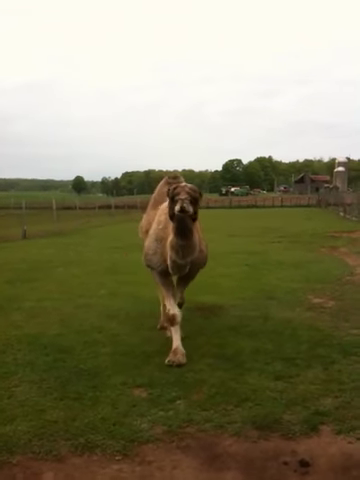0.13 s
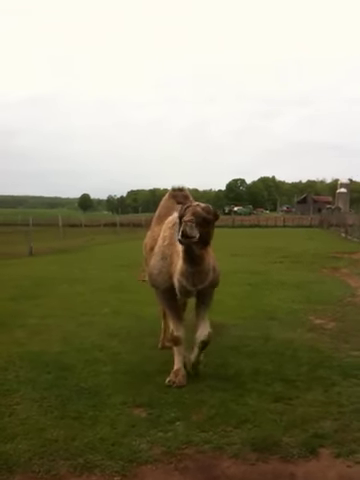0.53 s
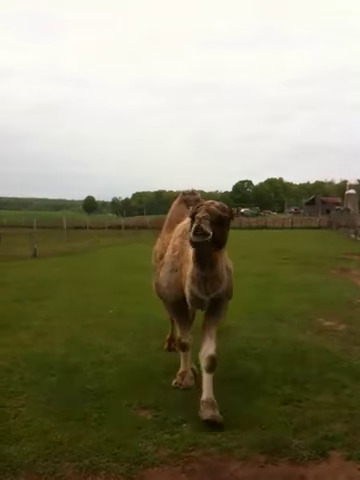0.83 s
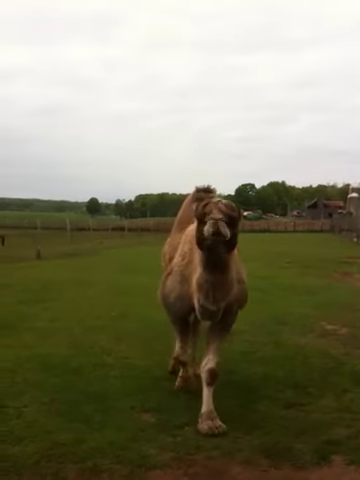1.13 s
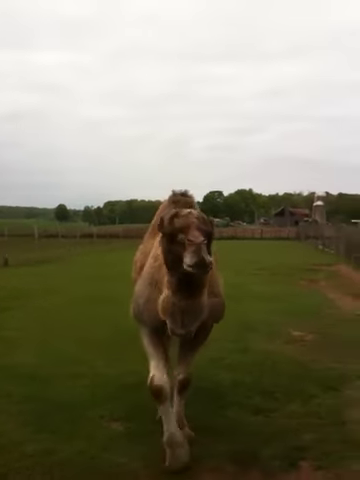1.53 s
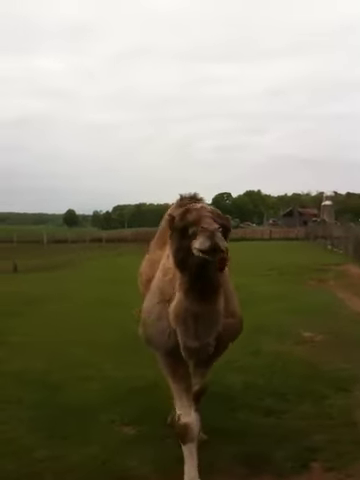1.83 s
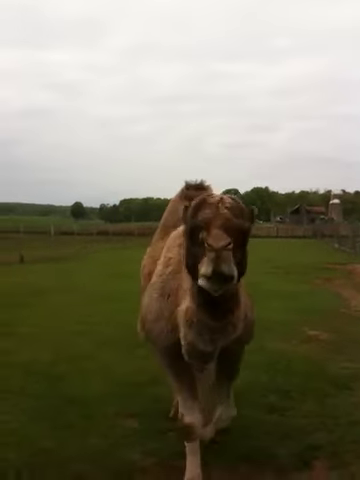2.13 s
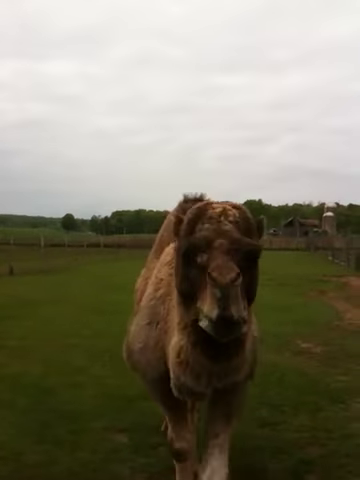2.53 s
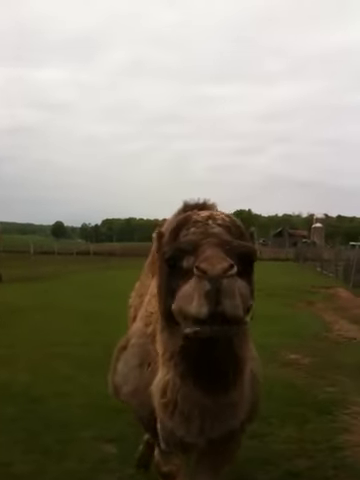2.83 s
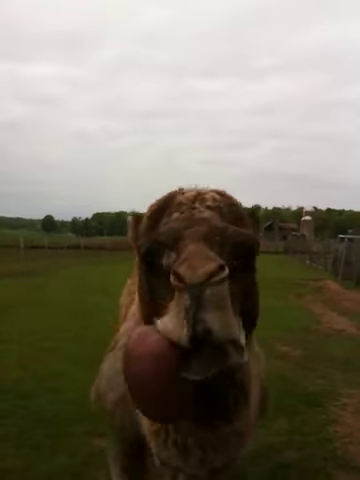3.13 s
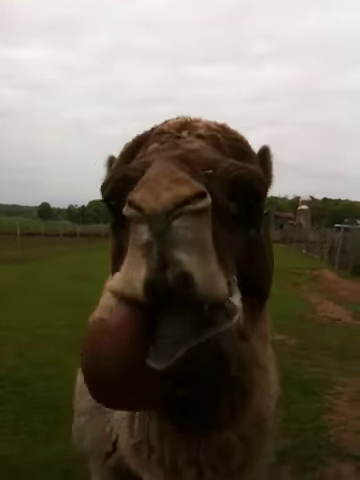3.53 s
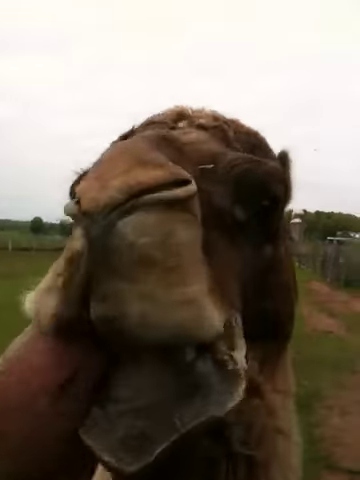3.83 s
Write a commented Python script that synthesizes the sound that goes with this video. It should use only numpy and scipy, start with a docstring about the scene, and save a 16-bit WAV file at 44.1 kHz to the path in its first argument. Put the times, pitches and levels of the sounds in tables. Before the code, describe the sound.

Over faint wind and hiss outdoors, a camel's low pulsing rumble grows and evens out. It swells into a loud, close, bubbling gurgle with spluttering spit, ending in the low flutter of its slack throat sac.

```python
"""Camel rumbling and gurgling

A camel in a field rumbles: slow pulses ring its throat and mouth, first loose, then an even purr.
Close by it blows out its throat sac: air bubbles through in a loud gurgle with wet puffs of spray,
then the slack sac flutters and the lips smack. Faint wind and hiss lie under it."""
import sys
import numpy as np
from scipy import signal
from scipy.fft import rfft, irfft, next_fast_len
from scipy.io import wavfile
from scipy.ndimage import uniform_filter1d, map_coordinates

SR = 44100
rng = np.random.default_rng(int(sys.argv[2]) if len(sys.argv) > 2 else 0)


def generate_wav(sig):
    """Save sig (samples, or channels by samples) to the path in sys.argv[1] as 16-bit PCM at SR."""
    pcm = np.round(np.clip(np.atleast_2d(sig).T, -1, 1) * 32767).astype(np.int16)
    wavfile.write(sys.argv[1], SR, pcm)


N = 176400


def amp(db):
    """Decibels to gain."""
    return 10 ** (np.asarray(db) / 20)


def unit(x):
    """Scale to rms 1."""
    return x / np.sqrt(np.mean(x ** 2) + 1e-20)


def curve(rows, column=1):
    """One column of a timed table, one value per sample."""
    rows = np.asarray(rows)
    return np.interp(np.arange(N) / SR, rows[:, 0], rows[:, column])


def fader(rows):
    """Gain of a level curve that fades in before its first point."""
    return amp(curve(rows) - 110 * np.maximum(rows[0][0] - np.arange(N) / SR, 0))


def wobble(rate):
    """A smooth random curve, rate knots a second."""
    return map_coordinates(rng.standard_normal(2048), [np.arange(N) * rate / SR], mode="wrap")


def even(x, span_s):
    """Hold the slow level of x near rms 1, keeping its fast flutter."""
    size = max(int(span_s * SR), 8)
    power = np.abs(uniform_filter1d(uniform_filter1d(unit(x) ** 2, size), size))
    return x / np.sqrt(np.mean(x ** 2) * (power + 0.0052))


def eq(x, points):
    """Minimum-phase filter through (freq_hz, gain_db) points."""
    size = 2 * next_fast_len(N // 2 + 8192)
    hz, db = np.transpose(points)
    gain = amp(np.interp(np.log(np.fft.rfftfreq(size, 1 / SR) + 1), np.log(hz + 1), db))
    cepstrum = irfft(np.log(gain), size)
    cepstrum[1:size // 2] *= 2
    cepstrum[size // 2 + 1:] = 0
    return irfft(rfft(x, size) * np.exp(rfft(cepstrum)), size)[:N]


def add(out, start_s, x):
    """Mix x into out at start_s."""
    i = int(np.clip(start_s * SR, 0, N))
    out[i:i + len(x)] += x[:N - i]


def glide(hz):
    """A sine that follows a pitch curve."""
    return np.sin(2 * np.pi * np.cumsum(hz) / SR)


def beats(rate, scatter):
    """Sample indices of pulses at a rate, their timing scattered by a share of the period."""
    i = np.flatnonzero(np.diff(np.floor(np.cumsum(rate) / SR)))
    shift = rng.standard_normal(4096)[:len(i)] * (scatter * SR / rate)[i]
    return np.clip(i + shift, 0, N - 1).astype(int)


def swell(t, rise_s):
    """Soft rise to 1 at rise_s, then a decay."""
    return (t / rise_s * np.exp(1 - t / rise_s)) ** 2


# Low wind and airy hiss: freq_hz, gain_db
WIND_EQ = [(20, -15), (64, -14.5), (125, -0.5), (232, -4.5), (408, -13.5), (1400, -25), (3300, -100)]
HISS_EQ = [(590, -23.5), (1100, -2), (5000, -4), (15500, -6.5)]


def field(wind_db=-71.5, hiss_db=-75.5):
    """A bed of light wind and even hiss."""
    wind = unit(eq(rng.standard_normal(N), WIND_EQ)) * amp(0.5 * wobble(2.8))
    hiss = unit(eq(rng.standard_normal(N), HISS_EQ))
    return amp(wind_db) * wind + amp(hiss_db) * hiss


# Wet clicks: start_s, peak_db, centre_hz, width_octaves
SMACK_HITS = [(1.089, -64, 560, 0.49), (1.422, -61.5, 596, 0.56), (1.889, -53, 590, 0.63),
              (2.038, -59, 594, 0.33), (2.117, -58.5, 3500, 1.6), (2.211, -58, 600, 0.51),
              (2.392, -51, 730, 0.28), (2.413, -54, 730, 0.27), (2.874, -60, 801, .9),
              (3.717, -45.5, 1600, 0.69), (3.747, -54, 2000, 1.7), (3.755, -52, 2300, .5),
              (3.755, -53.5, 6300, 0.44), (3.775, -56.5, 4000, 1.9), (3.851, -60.5, 1400, 0.85),
              (3.9, -51, 4000, 1.46), (3.921, -55, 1400, 0.81), (3.944, -54.5, 1000, 1.1),
              (3.952, -52, 950, 0.88)]


def smacks(t60_s=0.0058):
    """Lips and tongue click in short ticks of band-passed noise."""
    out, t = np.zeros(N), np.arange(SR // 30) / SR
    for start, db, hz, octaves in SMACK_HITS:
        edge = 2 ** (octaves / 2)
        band = signal.butter(2, [hz / edge, min(hz * edge, SR / 2 - 1)], "band", fs=SR, output="sos")
        click = signal.sosfilt(band, rng.standard_normal(len(t)) * amp(-60 * t / t60_s))
        add(out, start, amp(db) * click / np.abs(click).max())
    return out


def spray(count, decay_s, air):
    """Tiny saliva bubbles ring at 900 to 6300 Hz in a rush of air."""
    out, t = np.zeros(N), np.arange(SR // 60) / SR
    for when, pitch, size in rng.random((count, 3)):
        ping = np.exp(-t / decay_s) * np.sin(2 * np.pi * 900 * 7 ** pitch * t)
        add(out, when * N / SR, amp(5.5 * size) * ping)
    return air * rng.standard_normal(N) + unit(out)


# Puffs of spray: start_s, attack_s, hold_s, release_s, level_db, tilt_db_per_octave
PUFF_HITS = [(3.128, 0.036, 0.012, 0.36, -69.5, 1.5), (3.288, 0.035, 0.023, .15, -60.5, 1.6),
             (3.371, 0.027, 0.04, .05, -66, -0.5), (3.621, 0.015, 0.013, 0.037, -52.5, -0.5),
             (3.649, .01, 0.038, 0.044, -57.5, -1.5)]
# Bright sizzle of the spray: freq_hz, gain_db
SPRAY_EQ = [(500, -7), (1200, 1.5), (1900, -2), (3500, 1), (4800, -5), (6500, -1.5), (8500, -8),
            (10000, -14.5), (12200, -12.5), (14500, -45)]


def puffs():
    """Air bursts past the wet lips; each puff falls 30 dB in its release time."""
    out, t = np.zeros(N), np.arange(N) / SR
    wet = spray(count=2400, decay_s=0.003, air=1.5)
    for start, attack, hold, release, db, tilt in PUFF_HITS:
        rise = np.clip((t - start) / attack, 0, 1)
        fall = amp(-30 * np.maximum(t - start - attack - hold, 0) / release)
        tilted = [(hz, gain_db + tilt * np.log2(hz / 3000)) for hz, gain_db in SPRAY_EQ]
        out += amp(db) * rise * fall * unit(eq(wet, tilted))
    return out * amp(1.2 * wobble(110))


# Saliva sweep: time_s, pitch_hz, level_db
SQUELCH_SWEEP = [(3.385, 2400, -78.5), (3.415, 3550, -60), (3.455, 5000, -66), (3.55, 5000, -110)]


def squelch():
    """Saliva squelches in a thin, rough, rising tone."""
    tone = glide(curve(SQUELCH_SWEEP) * (1 + 0.08 * wobble(1500))) * amp(4 * wobble(150))
    started = np.arange(N) / SR > SQUELCH_SWEEP[0][0]
    return tone * amp(curve(SQUELCH_SWEEP, column=2)) * started


# Lip flutters: start_s, length_s, level_db, pitch_hz
SPLUTTER_HITS = [(3.019, 0.027, -71.5, 1650), (3.075, 0.023, -61, 700), (3.146, 0.05, -50, 730),
                 (3.318, .06, -47, 770), (3.335, 0.035, -65, 1170), (3.391, 0.044, -58, 1330),
                 (3.401, 0.079, -54, 1150), (3.62, 0.079, -52, 940), (3.697, .026, -51, 1120),
                 (3.686, 0.044, -41, 450), (3.926, .045, -46.5, 790), (3.876, 0.048, -33.5, 536.3),
                 (3.969, 0.03, -32, 490), (3.735, 0.047, -45, 557.6)]


def splutters():
    """Flapping wet lips ring a mouth cavity at an unsteady pitch."""
    out, t = np.zeros(N), np.arange(N) / SR
    for start, length, db, hz in SPLUTTER_HITS:
        arch = np.sin(np.pi * np.clip((t - start) / length, 0, 1))
        out += amp(db) * arch * glide(hz * (1 + 0.1 * wobble(450)))
    return out * amp(2.5 * wobble(90))


# Deep gulps: start_s, peak_db, final_pitch_hz
GLUG_HITS = [(.688, -58, 146), (1.084, -58, 268), (1.42, -47, 171), (1.624, -49.5, 176.6),
             (1.883, -47.5, 235), (1.903, -38, 145), (2.071, -38, 158)]


def glugs(drop_s=0.0026):
    """Single gulps whose pitch drops fast as they swell."""
    out, t = np.zeros(N), np.arange(SR // 10) / SR
    for start, db, hz in GLUG_HITS:
        tone = glide(hz * (1 + 2.53 * np.exp(-t / drop_s)))
        add(out, start, amp(db) * swell(t, rise_s=0.007) ** 1.9 * tone)
    return out


# Mouth formants: freq_hz, gain_db
MOUTH_EQ = [(250, -44), (380, 0), (440, -15.5), (490, -3), (560, -5), (635, 5), (700, -2.5), (770, -18),
            (950, -33), (2000, -52.5)]
# Crossfade to the brighter, wide-open mouth: time_s, open_share
MOUTH_OPENING = [(1.5, 0.6), (2.12, 0.44), (2.25, 0.03), (2.41, 0.55), (2.5, 0.18), (2.57, 0.67),
                 (2.63, 0.2), (2.8, 0.54), (3.0, 0.4)]
# Mouth resonance fader: time_s, level_db
MOUTH_LEVEL = [(1.5, -94), (1.68, -71), (1.8, -89), (1.9, -74.5), (1.98, -86), (2.11, -66.5), (2.3, -63),
               (2.37, -60.5), (2.41, -53.5), (2.5, -62.5), (2.62, -67), (2.76, -76.5), (3.05, -67)]


def mouth(source, open_ratio=1.138):
    """The mouth resonates; its formants sit higher when it is wide open."""
    formants = MOUTH_EQ + [(5000, -79.5)]
    narrow = eq(source, formants)
    wide = eq(source, [(hz * open_ratio, db) for hz, db in formants])
    opening = np.clip(curve(MOUTH_OPENING), 0, 1)
    return even((1 - opening) * narrow + opening * wide, 0.2) * fader(MOUTH_LEVEL)


# Throat pulses: time_s, rate_hz, scatter_periods
THROAT_PULSES = [(0, 25.5, 0.28), (1.8, 30.4, 0.16), (2.0, 42.4, 0.18), (2.12, 54, 0.043),
                 (2.42, 47.5, 0.015), (2.6, 45.2, 0.0068), (2.78, 48.2, 0.021), (2.9, 48, .15)]
# Broad, dark throat tone: freq_hz, gain_db
THROAT_EQ = [(30, -48.5), (100, -7), (150, -1.5), (220, 0.5), (330, -11.5), (390, -14), (460, -24),
             (1060, -78)]
# Main throat resonance: time_s, pitch_hz, level_over_broad_tone_db
THROAT_RESONANCE = [(1.5, 181.3, -7), (1.95, 163.7, 2), (2.2, 201.5, -2.5), (2.5, 190.6, 2),
                    (2.9, 178, 0.5)]
# Faders for the throat and the chest's fundamental: time_s, level_db
THROAT_LEVEL = [(0, -88), (.32, -74.5), (.47, -72), (.56, -83), (.7, -62.5), (.79, -80), (.85, -65),
                (.92, -78.5), (1.06, -62.5), (1.15, -74.5), (1.5, -66.5), (1.65, -59), (1.8, -56),
                (1.91, -49), (1.98, -55), (2.3, -53.5), (2.48, -48.5), (2.56, -54), (2.63, -52),
                (2.78, -53), (2.87, -50.5), (3.05, -46)]
CHEST_LEVEL = [(2.05, -92), (2.45, -70), (2.8, -100)]


def rumble(ring_t60_s=0.25):
    """Slow pulses ring the throat and mouth; air rasps after each, less in the even purr."""
    pulses, ring, t = np.zeros(N), np.zeros(N), np.arange(SR // 3) / SR
    rate, scatter = curve(THROAT_PULSES), curve(THROAT_PULSES, column=2)
    ring_hz, ring_gain = curve(THROAT_RESONANCE), amp(curve(THROAT_RESONANCE, column=2))
    ring_shape = amp(-60 * t / ring_t60_s) * (1 - np.exp(-t / 0.0015))
    strength = amp(1.8 * wobble(50))
    for i in beats(rate, scatter):
        pulses[i] = strength[i]
        add(ring, i / SR, strength[i] * ring_shape * np.sin(2 * np.pi * ring_hz[i] * t))
    airflow = signal.fftconvolve(pulses, swell(t, rise_s=0.0082))[:N]
    rasp_gain = np.minimum(0.4 + 2 * scatter, 0.65)
    source = unit(pulses) + rasp_gain * unit(airflow * rng.standard_normal(N))
    throat = even(unit(eq(source, THROAT_EQ)) + ring_gain * unit(ring), 0.015)
    breathy = source + 0.8 * unit(airflow * rng.standard_normal(N))
    chest = glide(rate) * amp(2 * wobble(14))
    return throat * fader(THROAT_LEVEL) + mouth(breathy) + chest * fader(CHEST_LEVEL)


# Flapping of the sac: time_s, pitch_hz, jitter_share
FLAP_PITCH = [(2.95, 149.1, .12), (3.25, 139.5, .15), (3.6, 132.5, 0.085), (3.75, 118.4, 0.061),
              (3.82, 121.5, .017), (3.94, 138.6, 0.071), (4.0, 168, 0.026)]
# Flap overtones: harmonic_number, level_db
FLAP_OVERTONES = [(2, -18.5), (3, -20.5), (4, -35)]
# Flap fader: time_s, level_db
FLAP_LEVEL = [(2.95, -45.5), (3.052, -50.5), (3.09, -38), (3.21, -39), (3.245, -32.5), (3.28, -42),
              (3.35, -32.5), (3.48, -34), (3.505, -30), (3.54, -28.5), (3.57, -27), (3.612, -33.5),
              (3.645, -31.5), (3.69, -32.5), (3.727, -37), (3.757, -26), (3.782, -33.5), (3.805, -24),
              (3.858, -22.5), (3.897, -31), (3.924, -21.5), (3.968, -31.5), (3.995, -21.5)]
# Hollow body of the sac, shared with the gurgle: freq_hz, gain_db
SAC_EQ = [(30, -48), (75, -35), (110, -8.5), (165, 3.5), (215, -0.5), (300, 2), (350, -11.5), (420, -8.5),
          (1200, -17.5)]


def sac_flutter():
    """The soft sac flaps, raggedly under the gurgle and more evenly as it slackens."""
    hz = curve(FLAP_PITCH) * (1 + curve(FLAP_PITCH, column=2) * wobble(90))
    overtones = sum(amp(db + 4 * wobble(40)) * glide(round(k) * hz) for k, db in FLAP_OVERTONES)
    flapping = (glide(hz) + overtones) * amp(2.7 * wobble(55))
    return even(eq(flapping, SAC_EQ), 0.039) * fader(FLAP_LEVEL)


def bubbles(pitch_hz, rate, rise_s, spread, scatter_db):
    """An uneven train of softly starting bubbles around a pitch."""
    out, t = np.zeros(N), np.arange(SR // 10) / SR
    spread = np.broadcast_to(spread, N)
    chance = rng.uniform(-1.7, 1.7, (1024, 2))
    for i, (detune, size) in zip(beats(np.full(N, rate), scatter=0.2222), chance):
        hz = pitch_hz[i] * np.exp(spread[i] * detune)
        add(out, i / SR, amp(scatter_db * size) * swell(t, rise_s) * np.sin(2 * np.pi * hz * t))
    return even(out, 0.017)


def droplets(points, rate, air):
    """Tiny films of saliva burst in a rush of air."""
    pops = (rng.random(N) < rate / SR) * rng.standard_normal(N)
    return unit(eq(unit(pops) + air * rng.standard_normal(N), points))


# Big bubbles: time_s, pitch_hz
BIG_PITCH = [(3.12, 220.7), (3.26, 241.7), (3.4, 277.4), (3.575, 239.7), (3.66, 266), (3.86, 226.7)]
# Small bubbles: time_s, pitch_hz, spread_share
SMALL_PITCH = [(3.68, 417.4, 0.032), (3.76, 561, 0.12), (3.82, 398.3, .08), (3.9, 521.6, 0.073),
               (4.0, 485, 0.084)]
# Wet fizz of the froth: freq_hz, gain_db
FROTH_EQ = [(350, -25), (600, 6), (800, 0.5), (1000, -7), (1250, -12.5), (1550, -17), (3000, -22.5),
            (8000, -34.5), (14000, -59)]
# Faders for big bubbles, small bubbles and froth: time_s, level_db
BIG_LEVEL = [(2.95, -57.5), (3.09, -37), (3.21, -30), (3.3, -28.5), (3.36, -25.5), (3.42, -22),
             (3.495, -28.5), (3.534, -25), (3.58, -27), (3.68, -25), (3.744, -47), (3.86, -31), (4.0, -28)]
SMALL_LEVEL = [(2.95, -82), (3.11, -51.5), (3.2, -51), (3.264, -56.5), (3.344, -37.5), (3.385, -41),
               (3.43, -31), (3.464, -51.5), (3.71, -43), (3.77, -51), (3.87, -43.5), (3.9, -35.5),
               (3.935, -43), (4.0, -37.5)]
FROTH_LEVEL = [(2.95, -74.5), (3.0, -68), (3.28, -63), (3.346, -52.5), (3.44, -54.5), (3.49, -65.5),
               (3.608, -61.5), (3.645, -49), (3.8, -65.5), (3.95, -56.5)]


def gurgle():
    """Air bubbles through the sac: big bubbles, smaller ones and froth."""
    big = bubbles(curve(BIG_PITCH), rate=48, rise_s=0.0073, spread=0.072, scatter_db=4)
    big = even(eq(big, SAC_EQ), 0.012)
    spread = curve(SMALL_PITCH, column=2)
    small = bubbles(curve(SMALL_PITCH), rate=71, rise_s=0.0081, spread=spread, scatter_db=5.5)
    cavity = bubbles(np.full(N, 1190), rate=55, rise_s=0.0072, spread=0.05, scatter_db=5.5)
    froth = unit(droplets(FROTH_EQ, rate=950, air=0.83) + amp(-11.5) * cavity)
    mix = big * fader(BIG_LEVEL) + small * fader(SMALL_LEVEL) + froth * fader(FROTH_LEVEL)
    return signal.sosfilt(signal.butter(4, 110, "high", fs=SR, output="sos"), mix)


# Accents on top of the gurgle: start_s, peak_db, pitch_hz
BURST_HITS = [(3.115, -21, 208), (3.157, -21.5, 233), (3.184, -19, 261), (3.241, -23.5, 234),
              (3.597, -18.5, 247.7), (3.634, -16.5, 267.5), (3.653, -15.5, 266.3), (3.694, -20, 263.3)]


def bursts():
    """The biggest bubbles swell and ring one by one."""
    out, t = np.zeros(N), np.arange(SR // 10) / SR
    for start, db, hz in BURST_HITS:
        add(out, start, amp(db) * swell(t, rise_s=0.0084) ** 1.27 * np.sin(2 * np.pi * hz * t))
    return out


def scene():
    """The camel in the open field, in mono."""
    voice = rumble() + gurgle() + bursts() + sac_flutter() + glugs()
    spit = puffs() + squelch() + splutters() + smacks()
    return (voice + spit + field())[None]


def record(dry, low_cut_hz=35, high_cut_hz=15750):
    """The microphone loses the deepest bass and the highest treble."""
    thin = signal.sosfilt(signal.butter(2, low_cut_hz, "high", fs=SR, output="sos"), dry)
    return signal.sosfilt(signal.ellip(12, 0.1, 90, high_cut_hz, fs=SR, output="sos"), thin)


dry = scene()
out = record(dry)
generate_wav(out)
```